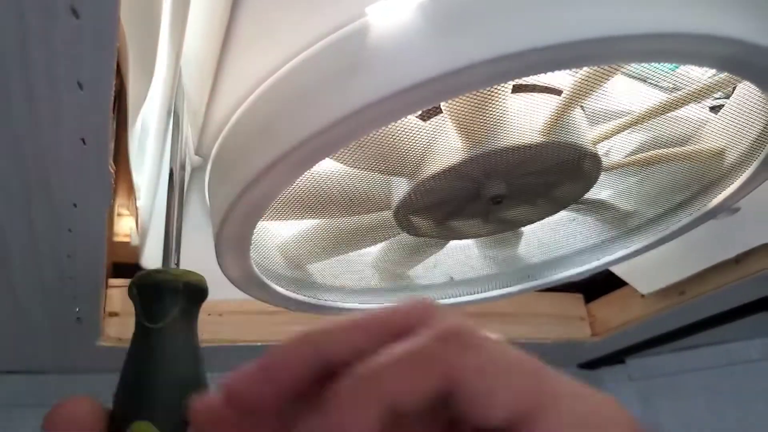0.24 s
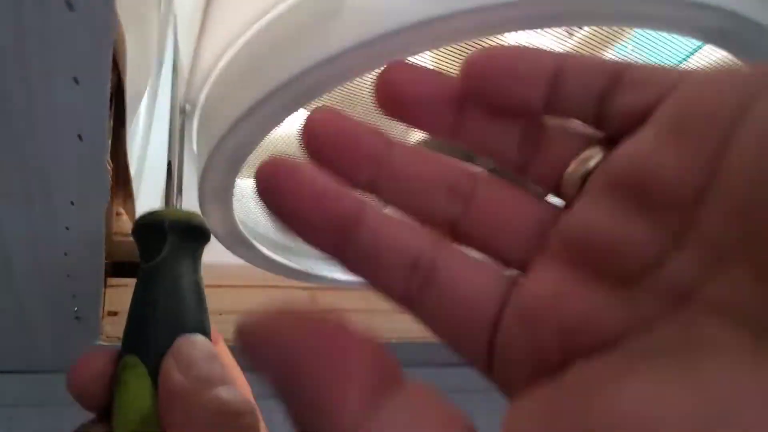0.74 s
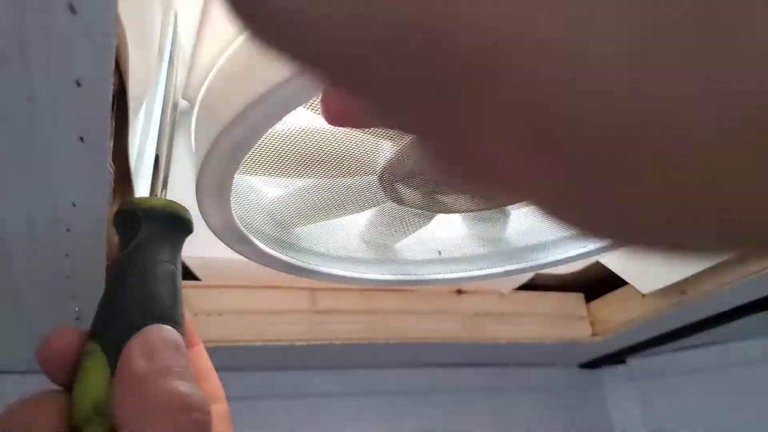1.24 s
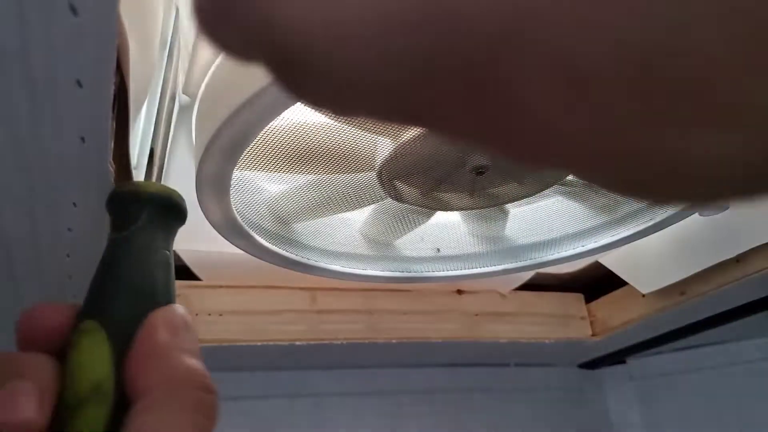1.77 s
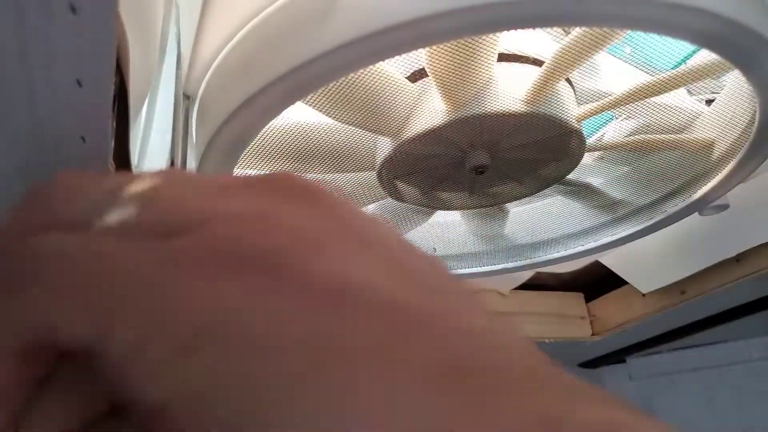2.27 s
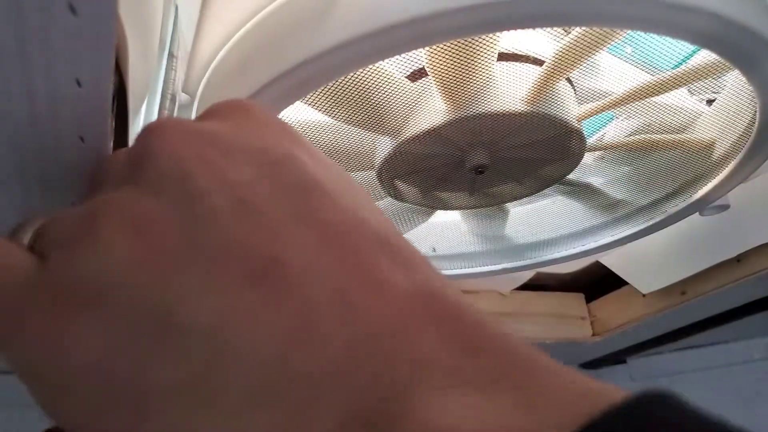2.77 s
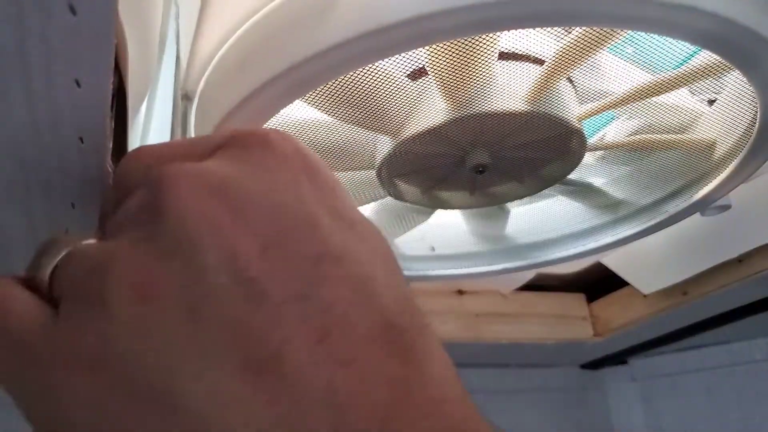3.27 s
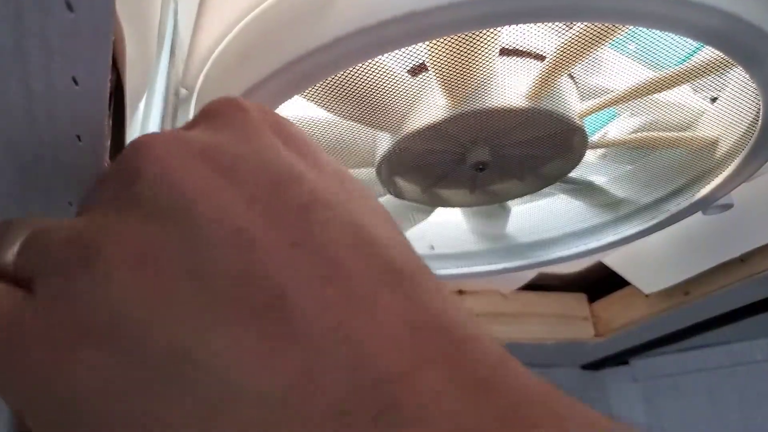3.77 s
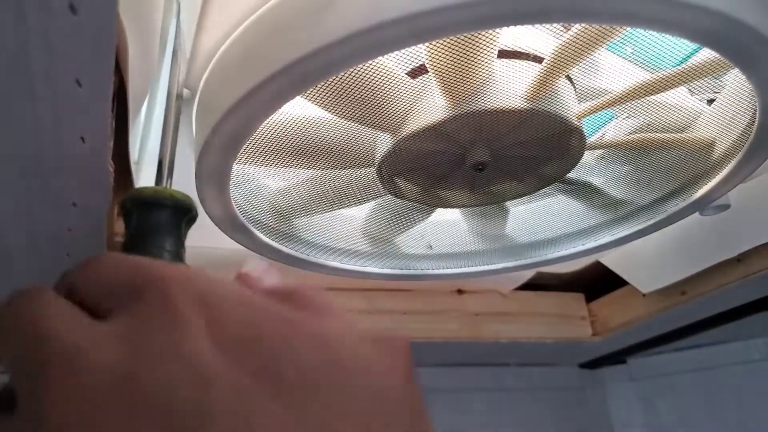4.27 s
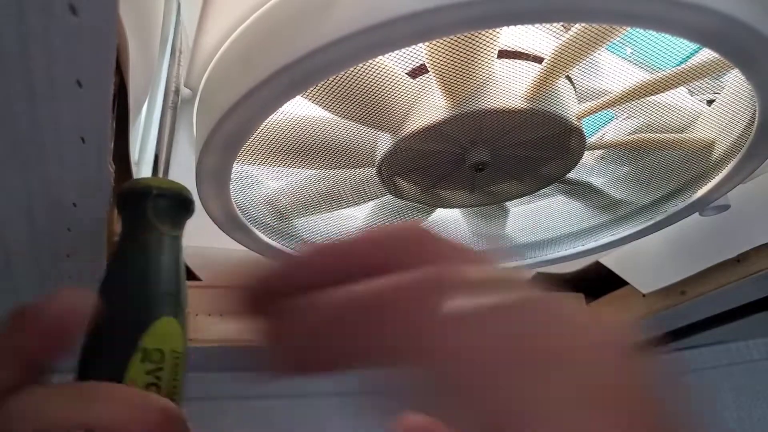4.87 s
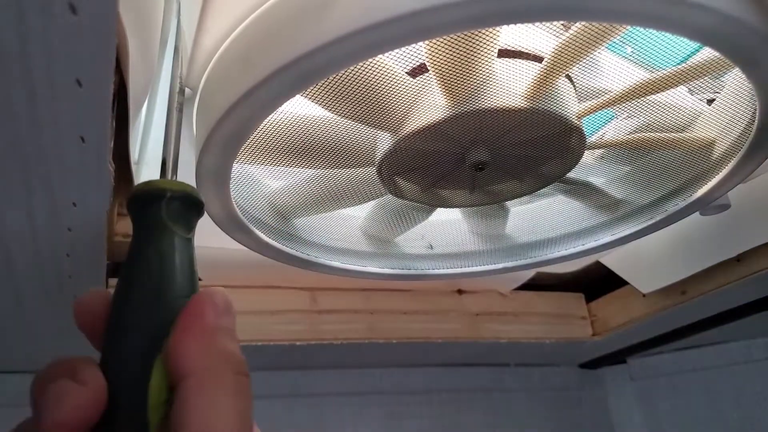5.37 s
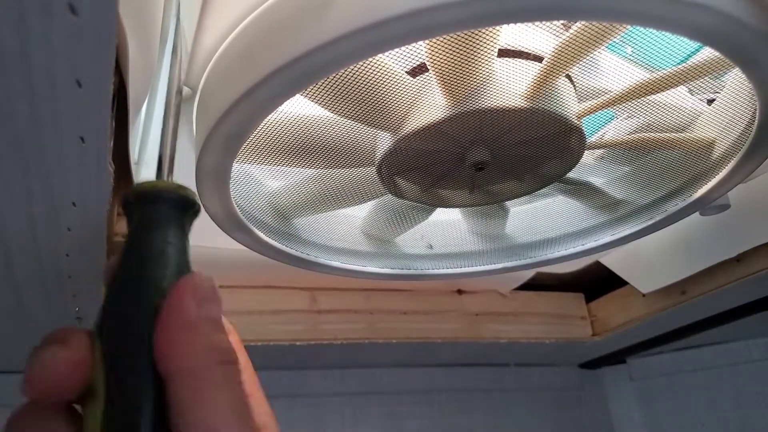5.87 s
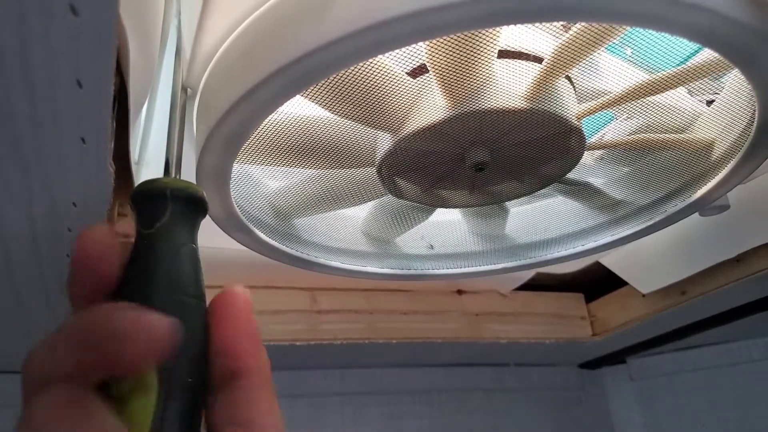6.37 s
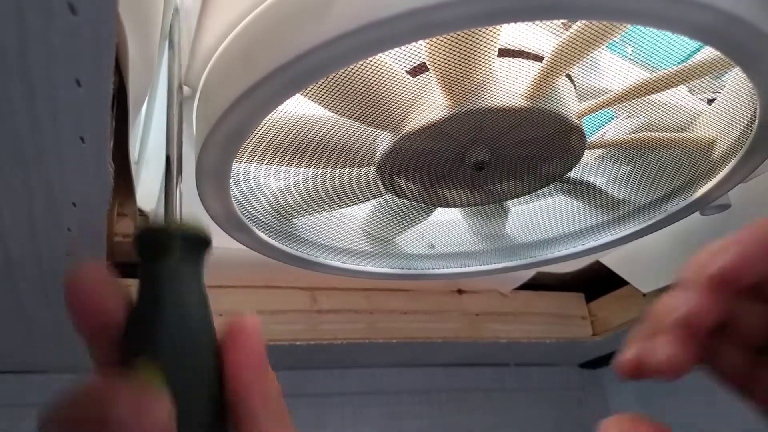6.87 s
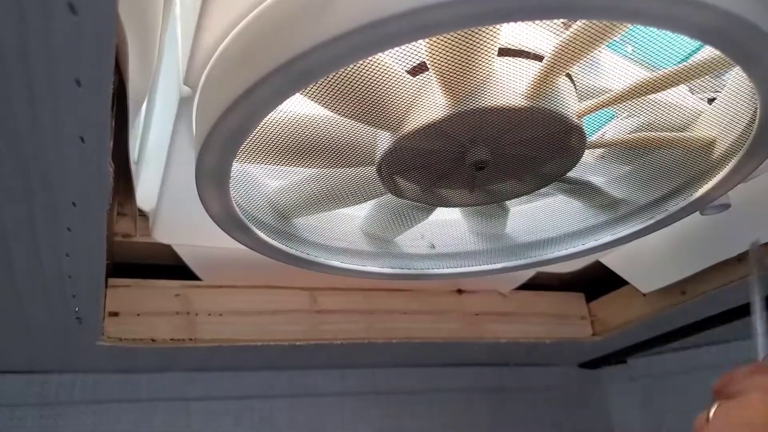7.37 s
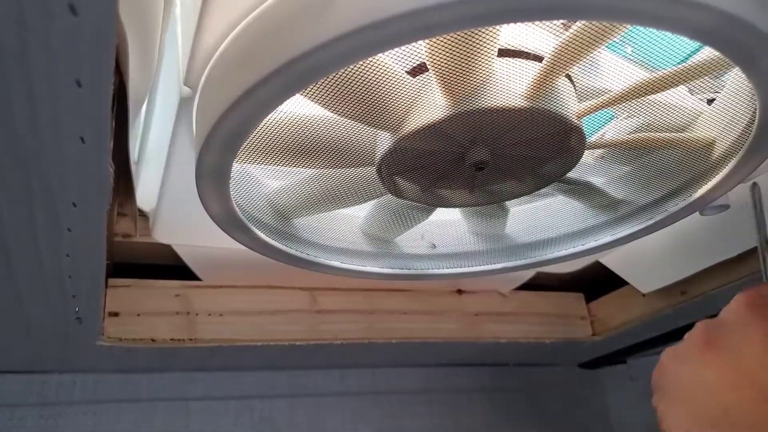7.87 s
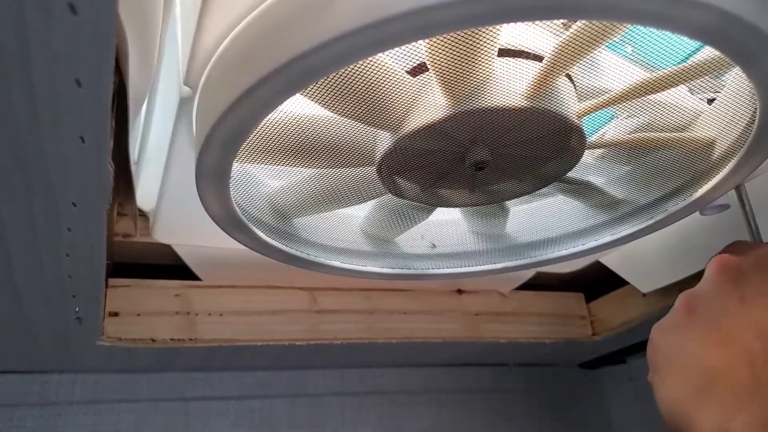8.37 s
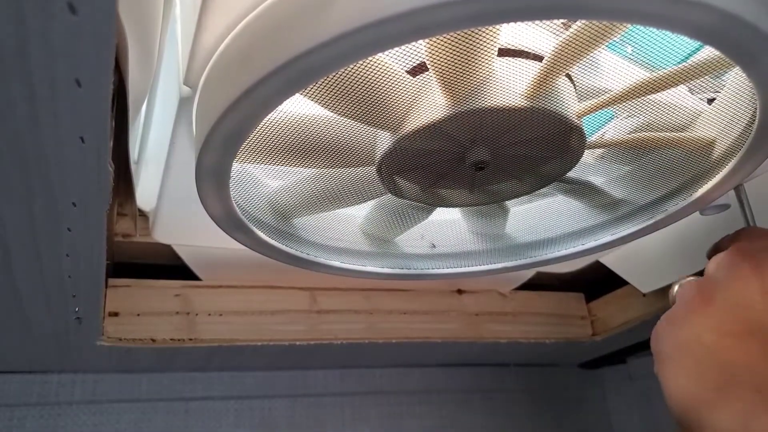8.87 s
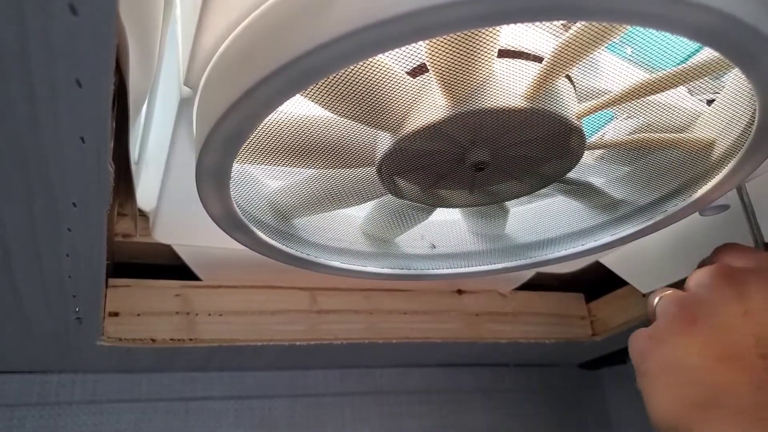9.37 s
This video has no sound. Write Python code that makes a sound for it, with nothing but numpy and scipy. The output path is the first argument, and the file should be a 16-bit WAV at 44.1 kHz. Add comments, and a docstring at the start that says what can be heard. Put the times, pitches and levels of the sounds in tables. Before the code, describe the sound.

Close phone pickup in a small, bare van cabin with a short boxy tail, faint hiss and a low rumble that swells as the arms move. It starts nearly quiet, with faint ticks at 0.3-0.5 s, then a loud hollow plastic clatter at 0.55-0.9 s, with a deep roof boom, and another firm knock at 1.1 s. A softer bump follows at 1.6 s, then faint hand rubs until 2.9 s. Medium clicks and brushing come at 3.0-3.5 s, and a looser run of taps and dull thuds at 4.1-5.1 s. A short bright scrape lands at 5.4 s, knocks at 5.9 s, small ticks around 6.4 s. A strong, sharp clack bursts at 6.95 s. After a lull, drier knocks at 8.1, 8.4 and 8.5 s surround a light scrape; faint taps end it by 9.6 s.

```python
"""Close, hollow plastic knocks and short scrapes, with dull booms, a short tail and a low rumble beneath.
A screwdriver is set into the screws of a plastic roof vent inside a small van, close to a phone.
Tool and hands excite the trim ring's modes and its dense clatter: single blows knock, streams of slips scrape.
The roof panel booms as slow-swelling low modes after the heavier pushes.
Shaped noise makes the rumble and faint hiss; band-wise decays give the bare cabin's tail."""
import sys
import numpy as np
from scipy import signal
from scipy.fft import rfft, irfft
from scipy.io import wavfile

SR = 44100
rng = np.random.default_rng(int(sys.argv[2]) if len(sys.argv) > 2 else 0)


def wav_record(signal):
    """Record a signal, one row per channel, as 16-bit PCM in the file named by sys.argv[1]."""
    frames = np.transpose(np.atleast_2d(signal))
    bounded = np.clip(frames, -1, 1)
    # unit amplitude maps onto the largest positive 16-bit level
    quanta = np.round(bounded * 32767).astype(np.int16)
    wavfile.write(sys.argv[1], SR, quanta)


N = 425124

# Knocks on the trim. Each row: start in seconds, contact resonance in Hz, strength in dB,
# hardness as treble slope in dB per octave, thud in dB over the strength.
KNOCKS = [(.317, 800, -42, -8, -10), (.38, 815, -47, -12.5, -4), (0.453, 806, -38.5, -9.5, -9),
          (0.558, 1290, -19.5, -4.5, -9), (.565, 885, -25, -3, -10.5), (.752, 1180, -36, -3.5, -11),
          (0.785, 1395, -17.5, -6, -7.5), (.817, 1150, -18.5, -4.5, -5.5), (0.845, 780, -17.5, -6, -3),
          (.859, 1240, -22, -6, -3.5), (1.082, 1360, -17.5, -6.5, -15), (1.259, 1200, -50, -5.5, -9),
          (1.299, 1215, -48.5, -5.5, -5.5), (1.42, 1350, -42.5, -3, -12.5), (1.45, 346, -42.5, -7, 2),
          (1.592, 1310, -42.5, -7, -8.5), (1.627, 1045, -27, -6, -20), (1.637, 1040, -32, -2.5, 1),
          (1.827, 1330, -53, -3.5, -13), (1.931, 220, -51.5, -2, 4), (2.038, 1970, -38.5, -8, -15),
          (2.28, 1700, -40.5, -8.5, -6), (2.529, 1600, -41, -9.5, -6.5), (3.014, 1615, -26, -6.5, -18),
          (3.099, 1700, -29.5, -3.5, -8), (3.472, 1760, -28, -7, -11.5), (3.569, 1580, -58, 1, 7.5),
          (3.896, 600, -43, -10, -7.5), (3.992, 200, -48, -12.5, 11), (4.118, 2000, -28, -2.4, -9),
          (4.286, 1880, -26, -3.5, -6), (4.378, 1260, -32.5, -15.5, -11), (4.463, 1346, -38.5, -7.5, -2),
          (4.676, 1970, -33, -10, -10), (4.767, 1240, -38.5, -2, -7), (4.92, 1305, -31, -8, -10),
          (4.985, 357, -59, 0.5, 9.5), (5.102, 2080, -34, -6, -9.5), (5.574, 3700, -37.5, -2.5, -9.5),
          (5.771, 1170, -45.5, -8.5, -11), (5.86, 1860, -28, -4.5, -10.5), (5.879, 1200, -32.5, -5.2, 0),
          (5.956, 222, -46, -3, 13), (5.965, 395, -24.5, -14, -2.5), (6.417, 603, -44.5, -9.5, -3),
          (6.441, 1210, -34.5, -8.5, -2.5), (6.578, 1210, -45.5, -9, -2), (6.935, 1200, -16, -9, -15),
          (6.962, 2090, -16.5, -6.5, -23), (6.967, 1050, -21.5, -12, -13), (6.985, 1320, -33, 0, -9),
          (7.0, 860, -35, -0.5, -27), (7.012, 1510, -29, -4, -9.5), (7.701, 223, -43, -14.5, -0.5),
          (8.091, 2150, -19.5, -7.5, -20.5), (8.416, 426, -28, -7, 0), (8.521, 1230, -16.5, -6.5, -4.5),
          (9.256, 1210, -38.5, -8.5, -5.5), (9.482, 634, -40.5, -21, 1.5),
          (9.599, 1740, -44.5, -10.5, -4.5)]
# Scrapes of the tool on trim and screw. Each row: middle in seconds, half length in seconds,
# contact resonance in Hz, strength in dB, treble slope in dB per octave, thud in dB over the strength.
SCRAPES = [(0.083, 0.065, 1420, -58, -8, -3), (0.7, 0.014, 980, -46, -9, 0),
           (.775, 0.016, 1160, -32.5, -5, -17.5), (0.959, .06, 1200, -33.5, -13.5, -4),
           (2.372, 0.1, 1720, -57.5, -5, -4), (4.345, 0.054, 1820, -52, -7, 0.5),
           (5.411, 0.023, 2050, -25.5, -4, -18.5), (6.414, 0.0079, 2000, -56, -11, -10),
           (6.937, 0.0069, 1290, -34, -3, -18.5), (8.083, 0.019, 970, -42, -6.5, 0.5),
           (8.25, 0.11, 2180, -38.5, -5.5, -10), (8.299, 0.065, 866, -42.5, -6, -4),
           (8.908, 0.11, 1490, -63, -2.5, -4)]
# Rubs of hand and sleeve. Each row: middle in seconds, half length in seconds, strength in dB,
# hardness as treble slope in dB per octave, thud in dB over the strength.
RUBS = [(1.232, 0.14, -54.5, -5, -6.5), (1.982, 0.12, -49, -4.5, 3), (2.526, 0.045, -50, -2, -8),
        (2.675, 0.062, -60, 0.2, 5.5), (2.999, 0.036, -41.5, -1.9, -13), (3.062, 0.093, -44, -3, 1),
        (3.43, 0.047, -38, -1.5, -10), (3.827, 0.031, -45, -1.1, -6.5), (4.044, 0.04, -74, 3.5, 23),
        (4.239, 0.083, -45, -2, 2), (4.477, 0.061, -62.5, 3, 10.5), (4.728, 0.028, -42.5, -1.6, -7),
        (5.27, 0.025, -37.5, -2.1, -0.5), (5.348, 0.038, -49.5, -2.1, -16), (5.484, 0.15, -53.5, -5.5, -2),
        (5.8, 0.11, -59, 0, 10.5), (6.531, 0.092, -61.5, -0.5, 5.5), (6.835, 0.06, -74, -6.5, 10.5),
        (7.016, 0.019, -39, -2.2, -2), (7.769, .04, -62.5, -12.5, 12), (8.391, .05, -50.5, -1, 0.5),
        (9.396, 0.19, -60, -3.5, 1)]
# Pushes that make the roof panel boom. Each row: start in seconds, level in dB.
PUSHES = [(0.559, -35.5), (0.788, -28.5), (0.85, -21), (0.93, -37.5), (0.998, -33.5), (1.446, -36),
          (1.634, -29), (2.042, -41), (2.277, -42.5), (2.531, -44.5), (2.678, -46.5), (3.012, -29.5),
          (3.097, -29), (3.343, -36), (3.461, -38), (3.879, -48.5), (3.992, -34), (4.12, -28), (4.283, -29),
          (4.47, -39), (4.661, -34.5), (5.103, -31.5), (5.267, -39), (5.859, -38), (5.956, -34.5),
          (6.958, -42.5), (8.414, -38.5), (8.59, -38)]
# Modes of the plastic housing and its frame, with the long ring of the screwdriver's metal shank at 1017 Hz.
# Each row: frequency in Hz, relative level in dB, t60 in seconds.
HOUSING_MODES = [(213, -7, .2), (236, -6, .18), (336, -10, .18), (409, -2, .17), (457, -9, .18),
                 (611, -7, .24), (818, -6, .24), (932, -4, .16), (1017, -13, .36), (1071, -6, .13),
                 (1141, -1, .14), (1192, -1, .12), (1275, 1, .11), (1450, -7, .11), (1612, -9, .12),
                 (1925, -6, .13), (1964, -4, .16), (2188, -8, .14), (2500, -7, .15), (3055, -10, .16),
                 (3414, -8, .14), (3710, -12, .13), (4382, -18, .15)]
# Colour of the dense plastic clatter. Each row: frequency in Hz, relative level in dB.
CLATTER_COLOUR = [(140, -2.5), (230, 1.5), (300, -1), (420, -11), (520, -6), (700, -4), (900, -4.5),
                  (1200, -7), (1600, -4), (2100, -2), (2900, -13.5), (3900, -2), (5200, -18), (7000, -24.5),
                  (11000, -23), (15500, -26)]
# Body, ring, clank, edge and crack ranges. Each row: low edge in Hz, high edge in Hz.
RANGES = [(145, 700), (700, 1600), (1600, 2800), (2800, 6000), (6000, 19000)]
# How readily ring, clank, edge and crack answer a knock. Each entry: gain in dB.
KNOCK_RESPONSE_DB = [-3, 0.2, 2.5, 0]
# How readily the same four ranges answer a rub or scrape. Each entry: gain in dB.
RUB_RESPONSE_DB = [-1.5, -2, 1.5, 0.5]
# Modes of the roof panel. Each row: frequency in Hz before detuning, relative level in dB.
ROOF_MODES = [(36, -11.5), (49, 0.5), (64, -0.5), (82, 2), (101, -3), (122, -7.5), (146, -23.5)]
# The cabin's tail and width. Each row: frequency in Hz, t60 in seconds, likeness of left and right from 0 to 1.
CABIN = [(198.8, .32, .93), (505, .36, .6), (1100, .26, .5), (2500, .21, 0), (4930, .21, .11),
         (14200, .12, 0)]
# Colour of the background. Each row: frequency in Hz, relative level in dB.
FLOOR_COLOUR = [(15, -56.5), (25, -11.5), (49, -5.5), (69, 4), (113, -3.5), (144, -8.5), (156, -12),
                (204, -17), (281, -20), (378, -35.5), (2060, -58), (6730, -53.5), (7910, -48),
                (9300, -54.5), (15500, -50.5)]
# Rumble as the arms move. Each row: time in seconds, level in dB before a fixed lift.
RUMBLE = [(0, -55.5), (.37, -51.5), (.8, -44), (1.5, -55.5), (1.96, -45), (2.35, -51), (3.75, -52.5),
          (4.1, -44.5), (4.9, -50.5), (5.4, -46.5), (6.2, -54), (6.7, -47), (7.4, -55.5), (9.64, -50.5)]

TIME = np.arange(N) / SR  # seconds into the scene
AGE = TIME[:SR // 2]  # seconds into one contact or push
TOP_HZ = 16300
PLATE_T60, CRACK_T60 = .115, .016  # seconds: crowded plastic modes, direct crack
SCATTER_DB = 2  # spread of the mode strengths between places of contact
FAVOUR_DB, FAVOUR_OCTAVES = 4, 0.43  # a contact favours the range around its own resonance
HAND_HZ = 256  # contact resonance of the soft hand
FAR_CORNER_S = 7.9  # seconds: the tool moves on to the screw in the far corner
NEAR_SHARE, FAR_SHARE = 0.19, 0.93  # low cut of a knock, as a share of its contact resonance


def knocks(mode_db=-6.5, snap_db=-4.5, hardening=0.33, firm_db=-32, contact_db=4, contact_quality=5,
           own=.6, pan_db=-1.25):
    """Each knock shakes the same housing; the hardness of the contact tilts its upper ranges."""
    out = np.zeros((2, N))
    shared = clatter()
    bank = mode_bank()
    for s, hz, *touch in KNOCKS:
        levels = range_levels(hz, *touch, KNOCK_RESPONSE_DB)
        # a stronger ring range brings more of the first crack
        crack = undb(snap_db + hardening * max(levels[1] - firm_db, 0)) * snap()
        # "own" is the power share of the clatter that changes with the place of contact
        rattle = np.sqrt(1 - own) * shared + np.sqrt(own) * clatter()
        blow = crack + rattle + undb(mode_db) * modes(bank)
        blow = blow + undb(contact_db) * resonance(blow, hz, contact_quality)
        blow = band(blow, deepest_hz(s, hz), SR, order=1)
        parts = [band(blow, *edges) for edges in RANGES]
        # each range is levelled over its first 30 ms
        sound = sum(undb(db) * part / rms(part[:, :SR // 33]) for db, part in zip(levels, parts))
        add(out, s, pan(sound, pan_db))
    return out


def rubs(slips_per_s=800, spread_db=3.5, grip_db=2.5, mode_db=-9, contact_db=6, contact_quality=9,
         lead_s=0.0074, pan_db=-1):
    """Friction is a stream of tiny slips that shake the housing; grip catches and lets go within a stroke."""
    out = np.zeros((2, N))
    bank = mode_bank()
    middle = AGE[-1] / 2
    hand_rubs = [(s, half, HAND_HZ, *touch) for s, half, *touch in RUBS]
    for s, half, hz, *touch in [*SCRAPES, *hand_rubs]:
        stroke = np.exp(-((AGE - middle) / half) ** 2)
        grip_times = AGE[::SR // 100]
        grip = np.interp(AGE, grip_times, rng.standard_normal(len(grip_times)))
        burst = np.minimum(rng.exponential(size=len(AGE)), 4)
        sizes = rng.standard_normal(len(AGE)) * undb(spread_db * burst + grip_db * grip)
        happens = rng.random(len(AGE)) < slips_per_s / SR
        slips = happens * sizes * stroke
        answer = clatter() + undb(mode_db) * modes(bank)
        grain = signal.fftconvolve(slips[None], answer, axes=1)[:, :SR * 3 // 4]
        grain = grain + undb(contact_db) * resonance(grain, hz, contact_quality)
        parts = [band(grain, *edges) for edges in RANGES]
        levels = range_levels(hz, *touch, RUB_RESPONSE_DB)
        sound = sum(undb(db) * part / rms(part) for db, part in zip(levels, parts))
        # the levels hold at the middle of the stroke
        sound = sound * np.sqrt(np.sum(stroke ** 2) / grain.shape[1])
        add(out, s - middle - lead_s, pan(sound, pan_db))
    return out


def range_levels(hz, strength_db, slope_db, thud_db, response_db):
    """Weight behind a contact feeds the body range; a softer contact loses more with each octave."""
    centres = np.sqrt(np.prod(RANGES[1:], axis=1))
    favour = FAVOUR_DB * np.exp(-(np.log2(centres / hz) / FAVOUR_OCTAVES) ** 2)
    upper = np.array(response_db) + favour + slope_db * np.log2(centres / centres[0])
    return strength_db + np.append(thud_db, upper)


def deepest_hz(s, contact_hz):
    """A contact passes little below a share of its resonance; the far corner's stiffer frame booms less."""
    share = FAR_SHARE if s > FAR_CORNER_S else NEAR_SHARE
    return np.clip(contact_hz * share, 20, SR / 4)


def snap(soft_hz=2600, wall_s=0.005, wall_db=-6, port_lag_s=.0001):
    """The direct crack of the contact reaches one microphone port first; the near wall echoes it."""
    burst = rng.standard_normal(len(AGE)) * fade(CRACK_T60)
    crack = signal.sosfilt(signal.butter(1, soft_hz, fs=SR, output="sos"), burst)
    lead = int(SR * port_lag_s * rng.standard_normal())
    wall_lags = (SR * wall_s * rng.uniform(.9, 1.1, 2)).astype(int)
    pair = np.array([np.roll(crack, max(late, 0)) + undb(wall_db) * np.roll(crack, lag)
                     for late, lag in zip((lead, -lead), wall_lags)])
    return pair / rms(crack[:SR // 500])


def clatter(cabin_db=-1.5):
    """Crowded plastic modes die quickly; the cabin carries them on, longer in the lower bands."""
    wash = noise(CLATTER_COLOUR, len(AGE))
    edges = [*(110 * 2.4 ** np.arange(6)), TOP_HZ]
    tail = 0
    for lo, hi in zip(edges[:-1], edges[1:]):
        tail = tail + band(wash, lo, hi, order=2) * fade(read(CABIN, np.sqrt(lo * hi)))
    return wash * fade(PLATE_T60) + undb(cabin_db) * tail


def mode_bank(spread_hz=750):
    """The clear modes of housing and shank as turning phasors; high ones reach the two sides out of step."""
    hz, db, t60 = np.transpose(HOUSING_MODES)
    rings = np.array([undb(d) * fade(t) * np.exp(2j * np.pi * f * AGE) for f, d, t in zip(hz, db, t60)])
    skew = (-1) ** np.arange(len(hz)) * np.minimum(hz / spread_hz, 1.6)  # radians
    return rings, np.exp(1j * np.outer([.5, -.5], skew))


def modes(bank):
    """The place of contact weights the housing's modes anew."""
    rings, sides = bank
    weight, phase = rng.standard_normal((len(rings), 2)).T
    strike = undb(SCATTER_DB * weight) * np.exp(1j * np.pi * phase)
    ring = ((sides * strike) @ rings).imag
    return ring / rms(ring[:, :SR // 50])


def roof(peak_s=0.035, tail_t60=0.15, tail_db=-13, detune=0.092, skew=0.057):
    """The heavy panel takes a few hundredths of a second to swing up after a push, then dies away."""
    out = np.zeros((2, N))
    rise = AGE / peak_s
    swell = (rise * np.exp(1 - rise)) ** 2 + undb(tail_db) * fade(tail_t60) * np.minimum(rise, 1)
    for s, db in PUSHES:
        boom = 0
        draws = rng.standard_normal((len(ROOF_MODES), 3))
        for (hz, mode_db), (tune, phase, side) in zip(ROOF_MODES, draws):
            turns = hz * (1 + detune * tune) * AGE + phase + np.array([[.5], [-.5]]) * skew * side
            boom = boom + undb(mode_db) * swell * np.sin(2 * np.pi * turns)
        add(out, s, undb(db) * boom / rms(boom[:, SR // 100:SR // 12]))
    return out


def background(split_hz=330, rumble_lift_db=2, hiss_db=-43.5):
    """A low rumble that rises and falls as the arms move, under a faint even hiss."""
    air = noise(FLOOR_COLOUR, N)
    low = signal.sosfiltfilt(signal.butter(2, split_hz, fs=SR, output="sos"), air)
    rumble_db = np.interp(TIME, *np.transpose(RUMBLE)) + rumble_lift_db
    return low * undb(rumble_db) + (air - low) * undb(hiss_db)


def noise(colour, size):
    """Coloured stereo noise; the cabin table sets how alike the two sides are at each frequency."""
    hz = np.arange(size // 2 + 1) * SR / size
    alike = np.clip(read(CABIN, hz, axis=2), 0, 1)
    mid, side = rfft(rng.standard_normal((2, size)))
    pair = mid * np.sqrt(1 + alike) + np.outer([1, -1], side * np.sqrt(1 - alike))
    x = irfft(pair * undb(read(colour, hz)), size)
    return x / rms(x)


def resonance(x, hz, quality):
    """One resonance, gain 1 at its centre."""
    return signal.lfilter(*signal.iirpeak(hz, quality, fs=SR), x)


def band(x, lo_hz, hi_hz, order=3):
    """Causal band-pass."""
    edges = [lo_hz, min(hi_hz, SR / 2 - 1)]
    return signal.sosfilt(signal.butter(order, edges, "band", fs=SR, output="sos"), x)


def fade(t60):
    """Exponential decay by 60 dB in t60 seconds."""
    return np.exp(-np.log(1000) * AGE / max(t60, 1e-3))


def read(table, hz, axis=1):
    """A column of a table, joined on a log-frequency axis."""
    table = np.array(table)
    return np.interp(np.log(hz + 1), np.log(table[:, 0]), table[:, axis])


def undb(db):
    """Decibels to gain."""
    return 10 ** (np.asarray(db) / 20)


def rms(x):
    """Root mean square, kept above zero."""
    return np.sqrt(np.mean(x ** 2)) + 1e-12


def pan(sound, left_db):
    """Level of left over right; a negative value leans right."""
    return sound * undb([[left_db / 2], [-left_db / 2]])


def add(out, s, sound):
    """Mix a stereo sound in from time s, trimmed to the scene."""
    i = int(s * SR)
    part = sound[:, max(-i, 0):max(N - i, 0)]
    out[:, max(i, 0):max(i, 0) + part.shape[1]] += part


def scene():
    """Tool, hands, roof and cabin together."""
    return knocks() + rubs() + roof() + background()


def record(dry):
    """The phone rounds only the very highest peaks and cuts the top."""
    rounded = dry / (1 + dry ** 4) ** .25
    return signal.sosfilt(signal.ellip(10, .2, 70, TOP_HZ, fs=SR, output="sos"), rounded)


dry = scene()
out = record(dry)
wav_record(out)
```